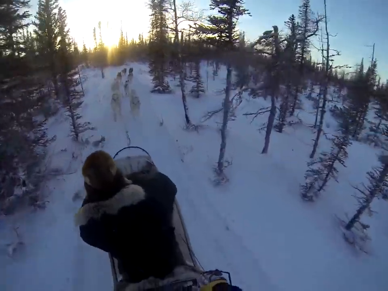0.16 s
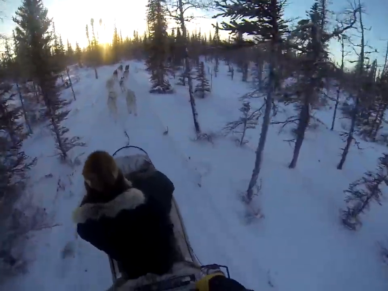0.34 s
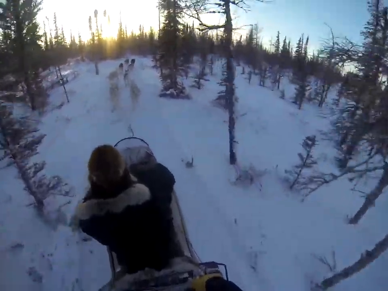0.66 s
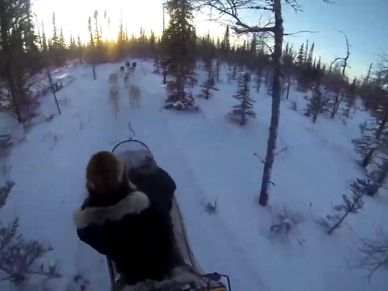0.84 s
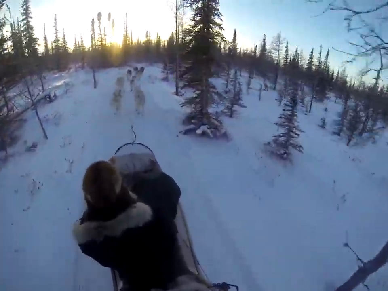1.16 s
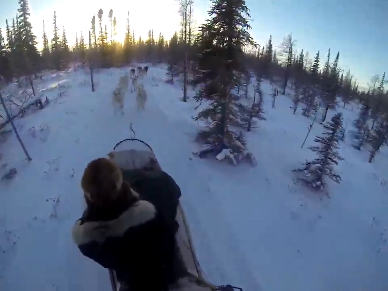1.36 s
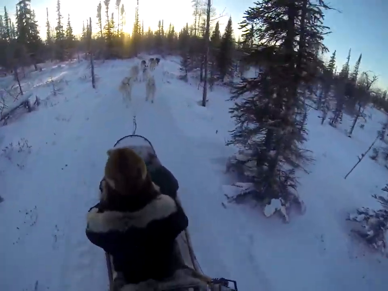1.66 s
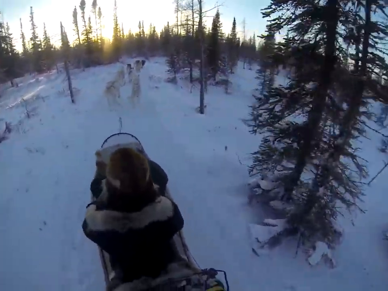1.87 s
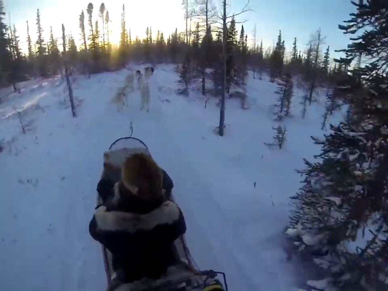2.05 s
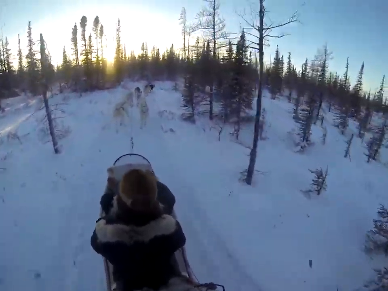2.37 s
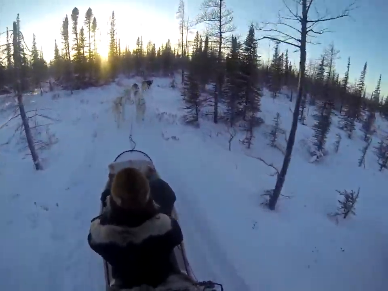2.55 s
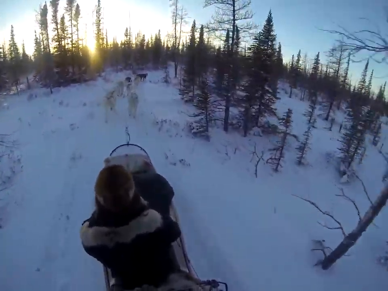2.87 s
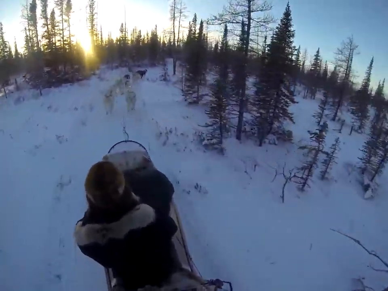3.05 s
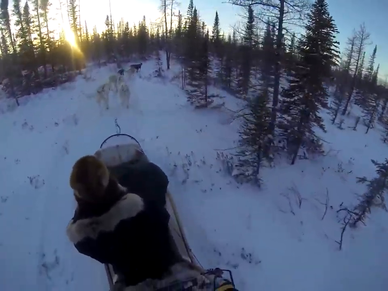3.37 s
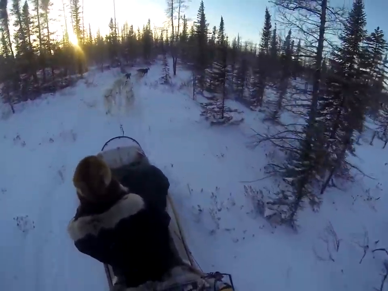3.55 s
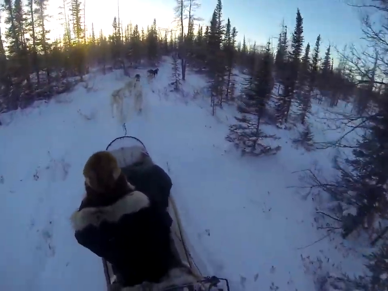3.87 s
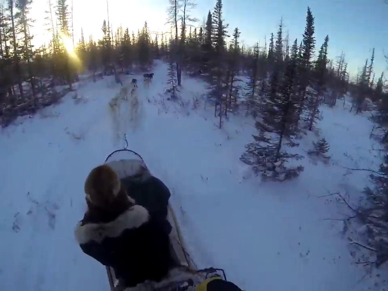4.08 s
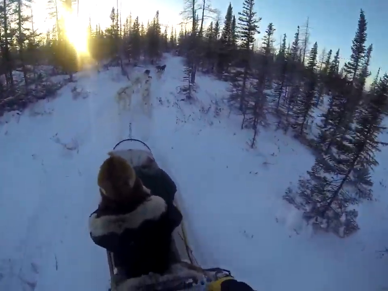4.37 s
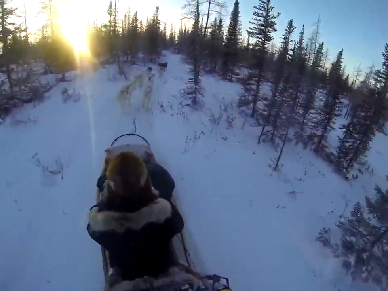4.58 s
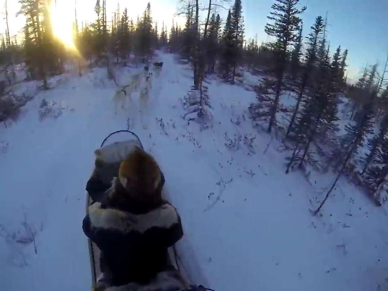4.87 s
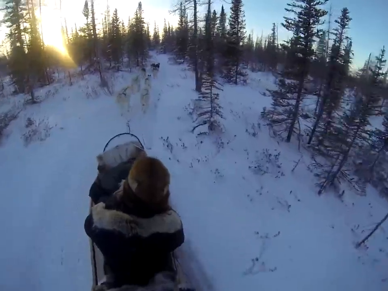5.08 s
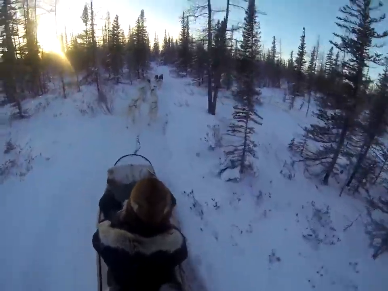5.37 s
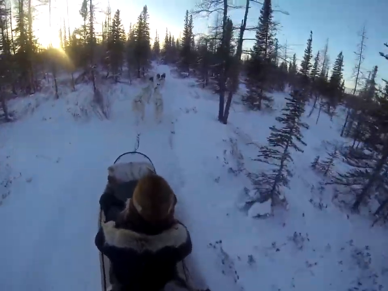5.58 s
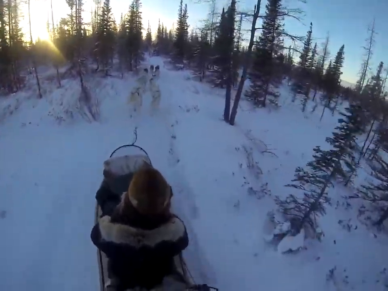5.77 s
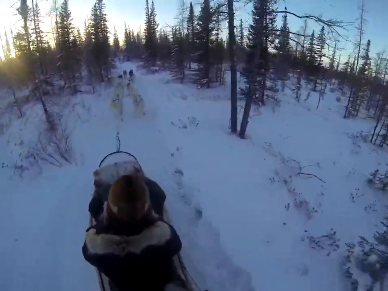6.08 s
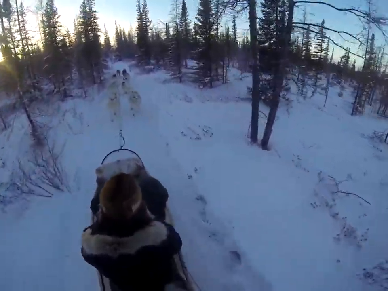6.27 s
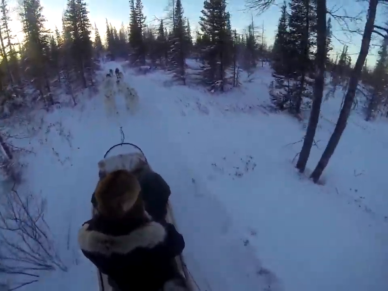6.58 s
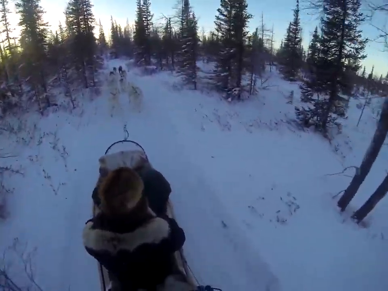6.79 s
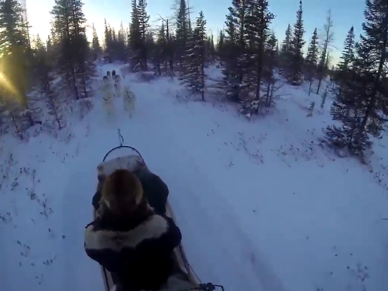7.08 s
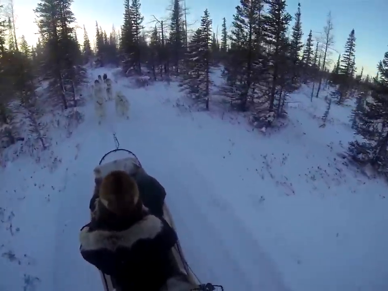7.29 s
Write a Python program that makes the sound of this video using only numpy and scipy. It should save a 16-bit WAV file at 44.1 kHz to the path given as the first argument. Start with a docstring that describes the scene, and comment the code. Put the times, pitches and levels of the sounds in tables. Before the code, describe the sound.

Deep bass wind and soft bumps on a moving sled, with quiet snow hiss, small crackles and one hard rattling jolt near 1.6 seconds.

```python
"""A low rumble of wind and jolts comes first: a dog sled runs along a snowy trail, heard from the driver's camera.
Filtered noise gives the wind, the droning frame, the runners' hiss over grainy snow and the sprayed powder.
Short enveloped oscillations give the jolts, taps and squeaks; tone with noise gives the thuds of the frame.
Bursts of noise and grains give rubbing cloth, scrapes, snapping ice and crumbling crust.
Short dull pulses of pressure sound at a knock and at the peak of the biggest jolt."""
import sys
import numpy as np
from scipy import signal
from scipy.fft import rfft, irfft, next_fast_len
from scipy.io import wavfile
from scipy.ndimage import uniform_filter1d, minimum_filter1d, map_coordinates

SR = 44100
rng = np.random.default_rng(int(sys.argv[2]) if len(sys.argv) > 2 else 0)


def put_to_file(sound):
    """Save the sound as 16-bit audio at rate SR, in the file named by the first command-line argument."""
    columns = np.atleast_2d(sound).T  # one column per channel
    safe = np.clip(columns, -1, 1)
    whole_steps = np.round(safe * 32767)
    wavfile.write(sys.argv[1], SR, whole_steps.astype(np.int16))


N = 327663

# Table levels are relative: each function adds its own offset or scaling.


def amp(db):
    """Level definition: decibels to amplitude gain."""
    return 10 ** (np.asarray(db) / 20)


def unit(x):
    """Normalisation: scale to rms 1."""
    return x / np.sqrt(np.mean(x ** 2) + 1e-20)


def clock():
    """Uniform sampling: the time of every sample in seconds."""
    return np.arange(N) / SR


def curves(rows):
    """Linear interpolation: one value per sample for each column after the time."""
    times, *columns = np.transpose(rows)
    return [np.interp(clock(), times, column) for column in columns]


def wobble(rate):
    """Band-limited fluctuation: a smooth random curve through `rate` knots a second."""
    knots = rng.standard_normal(int(N * rate / SR) + 4)
    return map_coordinates(knots, [clock() * rate])


def noise(count):
    """White noise: independent Gaussian samples."""
    return rng.standard_normal(count)


def coloured(x, points, tilt_db=0):
    """Minimum-phase filtering: shape x by (f/Hz, level/dB) points plus a tilt in dB per octave; rms 1."""
    size = 2 * next_fast_len(len(x) // 2 + 4096)
    octave = np.log2(np.fft.rfftfreq(size, 1 / SR) + 1)
    hz, db = np.transpose(points)
    response_db = np.interp(octave, np.log2(hz), db) + tilt_db * octave
    cepstrum = irfft(np.log(amp(response_db)))
    # Folding the cepstrum onto positive times makes the filter causal.
    cepstrum[1:size // 2] *= 2
    cepstrum[size // 2 + 1:] = 0
    response = np.exp(rfft(cepstrum))
    return unit(irfft(rfft(x, size) * response)[:len(x)])


def grains(count, rate, spread_db):
    """Random impulse process: about `rate` slips a second, of uneven size and random sign; rms 1."""
    chance, size, push = rng.random(count), noise(count), noise(count)
    slips = chance < rate / SR
    return unit(slips * amp(spread_db * np.clip(size, -2, 2)) * np.sign(push))


def swell(t, length):
    """Transient envelope: a quick rise to 1 at half the length and a slower fall."""
    u = 2 * t / length
    return u * np.exp(1 - u)


def add(track, s, sound):
    """Superposition: mix a sound into the track from time s in seconds."""
    part = track[round(s * SR):][:len(sound)]
    part += sound[:len(part)]


def load(press_s=0.013, half_db=-16):
    """Saturating response: how hard the jolts press the sled into the snow, 0-1; half_db alone gives 0.5."""
    t = clock()
    push = sum(amp(db - half_db) * np.exp(-.5 * ((t - s) / press_s) ** 2) for s, db, hz in JOLTS)
    return push / (1 + push)


# spectrum of wind on the microphone: f/Hz, level/dB
WIND_SPECTRUM = [(8, -11), (18, -6.5), (32, 2.5), (42, -4), (52, -7), (65, -16.5), (85, -36), (120, -41.5),
                 (250, -58.5), (600, -120)]
# gust strength: t/s, level/dB
GUSTS = [(0, -40), (.4, -35), (.7, -37), (1.08, -36), (1.3, -32), (1.6, -28), (1.8, -32.5), (2.03, -33.5),
         (2.55, -32.5), (2.9, -32.5), (3.25, -38), (3.65, -37), (4.05, -37.5), (4.3, -30.5), (4.8, -33),
         (5.4, -33.5), (5.85, -31), (6.4, -31.5), (6.7, -37.5), (7.15, -35.5), (7.4, -39.5)]


def wind(level_db=-0.5, evenness=0.84, flutter_db=4.0, flutter_rate=17, press_db=5.5):
    """Turbulent pressure: slow eddies, partly evened, flutter about the gusts and strengthen at jolts."""
    eddies = coloured(noise(N), WIND_SPECTRUM)
    power = np.abs(signal.hilbert(eddies)) ** 2
    strength = np.sqrt(np.abs(uniform_filter1d(power, size=2200)))
    strength = uniform_filter1d(strength, size=1100)
    evened = unit(eddies / (strength + 0.059) ** evenness)
    gust_db = curves(GUSTS)[0] + flutter_db * wobble(flutter_rate) + press_db * load()
    return amp(gust_db + level_db) * evened


# spectrum of the droning frame: f/Hz, level/dB
FRAME_SPECTRUM = [(50, -20), (90, -2.5), (125, -3.5), (160, -3), (240, -2), (310, -6.5), (400, -12),
                  (750, -20.5), (1100, -34), (3000, -58)]
# shaking of the frame on uneven ground: t/s, level/dB
SHAKE = [(0, -62.5), (0.28, -55.5), (0.45, -61.5), (0.95, -61), (1.15, -56.5), (1.42, -61), (1.8, -65),
         (2.7, -61), (3.3, -65), (3.8, -60.5), (4.15, -56), (4.52, -57), (4.73, -67.5), (5.2, -61.5),
         (5.45, -64), (6.3, -59), (6.75, -64), (7.15, -60.5), (7.43, -62)]


def frame_drone(ridges, level_db=-2.0, press_db=2.5, ridge_db=1.9):
    """Forced vibration: uneven ground shakes the frame, more strongly under load."""
    drone_db = curves(SHAKE)[0] + level_db + press_db * load() + ridge_db * ridges
    return amp(drone_db) * coloured(noise(N), FRAME_SPECTRUM)


# spectrum of the runners' hiss, coloured by the housing: f/Hz, level/dB
RUNNER_SPECTRUM = [(300, -15.5), (750, -14), (1050, -19.5), (1200, -9), (1370, 1), (1580, 2.5),
                   (1680, -3.5), (1800, -20.5), (2300, -29.5), (4000, -40.5)]
# runners gliding over the snow: t/s, level/dB
GLIDE = [(0, -53), (.17, -58.5), (.25, -54.5), (.4, -57.5), (.55, -58), (.66, -57.5), (.76, -61.5),
         (.88, -56.5), (.97, -61.5), (1.07, -56), (1.2, -65), (1.42, -55), (1.62, -56), (1.71, -60.5),
         (1.8, -58.5), (2.0, -59), (2.24, -60), (2.34, -54.5), (2.52, -58.5), (2.7, -54), (2.88, -60.5),
         (3.06, -56), (3.2, -58.5), (3.45, -59.5), (3.62, -57), (3.7, -53.5), (3.8, -56), (3.94, -49),
         (4.04, -55.5), (4.12, -56), (4.22, -53), (4.29, -60.5), (4.48, -54), (4.6, -60.5), (4.77, -56.5),
         (4.85, -59.5), (5.1, -55), (5.3, -59), (5.54, -63), (5.68, -60.5), (6.05, -57.5), (6.3, -57),
         (6.52, -63.5), (6.75, -63.5), (6.92, -60.5), (7.04, -57), (7.16, -54), (7.28, -68), (7.43, -60)]


def runner_hiss(crunch, ridges, level_db=0.0, press_db=-1, ridge_db=1.5):
    """Granular friction: crushed snow grains hiss, coloured by the housing and slightly weaker under load."""
    hiss_db = curves(GLIDE)[0] + level_db + press_db * load() + ridge_db * ridges
    return amp(hiss_db) * coloured(crunch, RUNNER_SPECTRUM)


# spectrum of sprayed powder: f/Hz, level/dB
SNOW_SPECTRUM = [(900, -8), (1500, -8.5), (2000, 1.5), (2450, -2.5), (3000, -0.5), (3500, -6.5), (4200, -6),
                 (5000, -8), (5700, -11.5), (6900, -14.5), (7700, -10), (8900, -17), (12400, -16.5),
                 (14000, -47)]
# loose snow sprayed by the runners: t/s, level/dB
SPRAY = [(0, -65), (0.6, -68.5), (1.25, -68.5), (1.8, -68.5), (2.35, -66.5), (2.9, -66), (3.55, -67),
         (3.92, -64), (4.3, -67.5), (4.6, -67.5), (5.05, -66), (5.45, -68.5), (6.35, -66.5), (6.7, -68),
         (7.43, -69)]


def snow_spray(crunch, ridges, level_db=3.5, ridge_db=0.95):
    """Granular scatter: powder sprays as broadband noise that shares the crunch of the runners."""
    powder = 0.51 * crunch + noise(N)
    spray_db = curves(SPRAY)[0] + level_db + ridge_db * ridges
    return amp(spray_db) * coloured(powder, SNOW_SPECTRUM)


def sled(ridge_rate=22):
    """Common excitation: small ridges in the trail modulate drone, hiss and spray together."""
    ridges = wobble(ridge_rate)
    crunch = grains(N, rate=1500, spread_db=6) + 0.89 * noise(N)
    return frame_drone(ridges) + runner_hiss(crunch, ridges) + snow_spray(crunch, ridges)


# a runner squeaking on cold snow: t/s, peak level/dB, length/s, starting f/Hz
SQUEAKS = [(4.195, -47.5, 0.012, 2030), (4.198, -46, 0.065, 1387), (4.232, -52, .032, 2214)]


def squeaks(level_db=-3.0, rise_hz_per_s=1500, waver=0.017):
    """Stick-slip oscillation: friction locks briefly into a thin, unsteady note that rises."""
    out, t = np.zeros(N), np.arange(SR // 10) / SR
    for s, db, length, hz in SQUEAKS:
        pitch = (hz + rise_hz_per_s * t) * (1 + waver * wobble(300)[:len(t)])
        arch = np.sin(np.pi * np.minimum(t / length, 1))
        note = np.sin(2 * np.pi * np.cumsum(pitch) / SR)
        add(out, s, amp(db + level_db) * arch * note)
    return out


# mean spectrum of contacts on the housing: f/Hz, level/dB
CONTACT_SPECTRUM = [(200, -16.5), (700, -31), (1050, -15), (1400, 9.5), (1850, -6), (2800, -6.5),
                    (3500, -9), (4200, -8.5), (6500, -19.5), (7800, -17.5), (9000, -25.5), (12500, -31),
                    (15000, -50)]


def contact_colour(uneven_db=3.0, count=70):
    """Modal excitation: each contact point stresses other narrow housing resonances; (f/Hz, level/dB)."""
    hz, db = np.transpose(CONTACT_SPECTRUM)
    grid = np.geomspace(hz[0], hz[-1], count)
    uneven = np.interp(np.log(grid), np.log(hz), db) + uneven_db * noise(count)
    return np.transpose([grid, uneven])


# patches of crust crumbling under the sled: t/s, level/dB, length/s, tilt/(dB per octave)
CRUMBLES = [(1.444, -47, 0.22, -2.5), (4.738, -54.5, 0.07, 2), (4.87, -56, 0.091, 2),
            (5.034, -53, 0.11, -2), (6.289, -61, .2, -1.5)]


def crumbles(level_db=-2.5, rate=420, spread_db=4):
    """Successive brittle fracture: crust gives way in a run of sharp grains that swells and fades."""
    out, t = np.zeros(N), np.arange(SR // 3) / SR
    for s, db, length, tilt_db in CRUMBLES:
        arch = np.sqrt(np.abs(np.sin(np.pi * np.minimum(t / length, 1))))
        crust = coloured(grains(len(t), rate, spread_db), contact_colour(), tilt_db)
        add(out, s, amp(db + level_db) * arch * crust)
    return out


# snaps of ice and snow crust: t/s, peak level/dB, 1/e decay/s, tilt/(dB per octave)
TICKS = [(1.4155, -31, .0025, -2.5), (1.5056, -22, 0.0026, -3.5), (1.5196, -21, 0.0048, 0),
         (1.552, -30, 0.0029, -2), (1.6038, -20.5, 0.0022, -3), (1.626, -39, 0.004, 2),
         (1.633, -26, 0.0032, -4.5), (3.995, -35, 0.0027, 1), (4.68, -38.5, 0.0037, 2),
         (4.7, -37, .004, -1), (4.712, -34.5, .003, 2), (4.727, -41, 0.0034, 6), (4.742, -44, .006, 6),
         (4.761, -44, .003, -6), (4.7775, -41, 0.0053, 7), (4.787, -35, .003, 1), (4.798, -36, .004, 3),
         (4.895, -43, .003, 9), (4.927, -26, 0.004, 0.5), (4.934, -39, 0.0062, -1), (5.034, -37, .004, -1),
         (5.064, -39, .003, 1), (5.384, -38, .004, -1), (6.212, -42, 0.0044, -7),
         (6.2302, -36.5, 0.011, -2.5), (6.281, -34, .005, -10), (6.3722, -25.5, 0.0045, -5.5),
         (6.381, -39, 0.0048, -1), (6.428, -36.5, 0.0074, -3.5), (6.444, -42, .004, 1),
         (6.5655, -36.5, .004, -3), (6.826, -34, 0.0035, -1.5), (6.841, -42, 0.004, -2),
         (7.018, -37, 0.0032, -3), (7.15, -47, 0.0071, 1.5)]


def ticks(level_db=-8, attack=0.00027):
    """Brittle fracture: crust and ice snap with a sudden crack that dies in a few milliseconds."""
    out, t = np.zeros(N), np.arange(SR // 10) / SR
    for s, db, decay, tilt_db in TICKS:
        crack = coloured(noise(len(t)), contact_colour(), tilt_db)
        envelope = (1 - np.exp(-t / attack)) * np.exp(-t / decay)
        add(out, s, amp(db + level_db) * envelope * crack)
    return out


def rub(db, length, tilt_db, colour):
    """Stick-slip friction: one short gritty burst, its brightness set by tilt_db."""
    t = np.arange(SR // 5) / SR
    slips = grains(len(t), rate=1500, spread_db=1.5) + 0.26 * noise(len(t))
    return amp(db) * swell(t, length) * coloured(slips, colour, tilt_db)


# cloth rubbing on the housing: t/s, peak level/dB, length/s, tilt/(dB per octave)
SCUFFS = [(0.457, -42, 0.0066, -4), (0.7, -46.5, 0.0068, 1), (1.054, -46, 0.011, -0.5),
          (1.448, -39.5, 0.029, -0.5), (1.494, -32, 0.0097, -5.5), (1.512, -37, .01, -5.5),
          (1.534, -29.5, 0.015, -4), (1.582, -41, 0.016, -3.5), (1.602, -36, 0.014, -2.5),
          (1.622, -39, 0.017, -5), (3.874, -51, 0.032, -3), (4.459, -36.5, 0.0045, -4),
          (4.741, -43, 0.021, -0.5), (4.878, -44.5, 0.027, -1.5), (5.033, -41.5, 0.027, -2),
          (5.072, -35, 0.013, -5.5), (5.142, -45, 0.018, 3.5), (5.669, -45, 0.012, 2), (6.33, -51, .03, -3),
          (6.452, -45.5, 0.016, -3.5), (6.552, -46.5, 0.022, -1.5), (7.11, -42, 0.04, -4.5)]
# faint rustles at random moments
RUSTLES_PER_S, RUSTLE_DB, RUSTLE_SPREAD_DB = 7, -51.5, -1.5
RUSTLE_S, RUSTLE_TILT_DB = 0.0057, -3


def scuffs(level_db=-8):
    """Sliding friction: clothing rubs strongly at set times and rustles faintly at random moments."""
    out = np.zeros(N)
    for s, db, length, tilt_db in SCUFFS:
        add(out, s, rub(db + level_db, length, tilt_db, contact_colour()))
    for when, size in rng.random((int(RUSTLES_PER_S * N / SR), 2)):
        rustle_db = RUSTLE_DB + level_db + RUSTLE_SPREAD_DB * (2 * size - 1)
        add(out, when * N / SR, rub(rustle_db, RUSTLE_S, RUSTLE_TILT_DB, contact_colour()))
    return out


# hard scrapes: t/s, peak level/dB, length/s, tilt/(dB per octave), resonance f/Hz
SCRAPES = [(1.4593, -31.5, 0.0058, 1, 5500), (1.5026, -32, 0.006, 0.5, 4170),
           (1.527, -31.5, 0.0065, 2.5, 5700), (1.533, -44, 0.016, 1, 4450),
           (1.5975, -28, 0.0049, -4.5, 2300), (1.61, -35, 0.0036, 2, 4500), (5.085, -32, .006, -3.5, 1950),
           (5.14, -35, 0.005, 2.5, 4970)]


def scrapes(level_db=-8, ring_db=8, width_octaves=0.062):
    """Friction-driven resonance: hard surfaces skid briefly and one resonance stands out of each skid."""
    out = np.zeros(N)
    for s, db, length, tilt_db, ring_hz in SCRAPES:
        hz, colour_db = contact_colour().T
        lift_db = ring_db * np.exp(-.5 * (np.log2(hz / ring_hz) / width_octaves) ** 2)
        colour = np.transpose([hz, colour_db + lift_db])
        add(out, s, rub(db + level_db, length, tilt_db, colour))
    return out


# sharp taps on the housing: t/s, peak level/dB, ring f/Hz, 60 dB decay/s
TAPS = [(0.3464, -27, 1580, 0.0086), (0.701, -45.5, 1420, 0.031), (0.882, -44.5, 1430, 0.0093),
        (1.415, -44, 1490, .02), (1.5412, -33, 1370, 0.042), (1.582, -39.5, 1430, 0.035),
        (1.604, -33.5, 1540, 0.013), (2.577, -47, 1440, 0.0099), (3.717, -42.5, 1524, 0.029),
        (3.862, -46, 1410, 0.021), (3.932, -44, 1326, 0.035), (4.0284, -40, 1430, 0.017),
        (5.0895, -36, 1390, 0.045), (6.829, -50, 1450, 0.024), (6.842, -47.5, 1490, 0.038)]
# the housing's modes: ratio to ring f, level/dB
HOUSING_MODES = [(1.001, 4.5), (1.27, -21.5)]


def taps(attack=0.00048, crack=0.13, crack_tilt_db=-3, level_db=3):
    """Impulsive modal response: hard contacts crack and set the housing ringing, with exponential decay."""
    out, t = np.zeros(N), np.arange(SR // 10) / SR
    for s, db, hz, t60 in TAPS:
        ring = sum(amp(mode_db) * np.sin(2 * np.pi * hz * ratio * t) for ratio, mode_db in HOUSING_MODES)
        ring = ring + crack * coloured(noise(len(t)), CONTACT_SPECTRUM, crack_tilt_db)
        decay = amp(db + level_db - 60 * t / t60)
        add(out, s, decay * (1 - np.exp(-(t / attack) ** 2)) * ring)
    return out


# dull pushes of pressure: t/s, peak level/dB, 1/e decay/s
PUSHES = [(0.3459, -34, 0.0008), (1.6339, -17.5, 0.0081)]


def pressure_pushes(rise=0.0004):
    """One-sided pulse: short dull pushes at a knock and at the biggest jolt, as of an overloaded microphone."""
    out, t = np.zeros(N), np.arange(SR // 10) / SR
    for s, db, decay in PUSHES:
        onset = (1 - np.exp(-(t / rise) ** 2)) ** 2
        add(out, s, amp(db) * onset * np.exp(-t / decay))
    return out


# dull blows through the frame: t/s, peak level/dB, length/s, tilt/(dB per octave), starting ring f/Hz
THUDS = [(1.044, -30, 0.0084, -5, 171), (1.072, -34.5, 0.0083, -7, 243), (1.101, -41.5, 0.026, -2, 245),
         (1.141, -36, 0.018, -8.5, 179), (1.451, -26, 0.017, -2, 191), (1.492, -24.5, 0.02, -2.5, 192),
         (1.507, -24, 0.0092, 3, 240), (1.540, -24.5, 0.015, 0, 238), (1.582, -28.5, 0.021, 3, 225),
         (1.612, -30, 0.031, -4.5, 154), (1.703, -40, 0.0085, -2, 180), (4.5, -40, 0.085, -9.5, 130.4),
         (5.071, -43, 0.016, 1, 232), (5.085, -33, 0.018, 1, 238), (6.232, -43, .014, 1.5, 235),
         (6.37, -46, 0.016, 2.5, 265), (6.56, -46.5, 0.014, 1.5, 230), (7.12, -46.5, 0.031, 3.5, 219)]
# noise spectrum of a blow before its tilt: f/Hz, level/dB
BLOW_SPECTRUM = [(50, -23.5), (110, 9), (160, 9.5), (235, 8), (320, -1), (420, -9), (750, -11.5),
                 (1100, -40), (3000, -56.5)]


def thuds(level_db=-10.0, ring=1.26, fall_hz_per_s=400):
    """Damped resonance: the wooden frame drops into ruts and rings, its pitch falling steadily."""
    out, t = np.zeros(N), np.arange(SR // 5) / SR
    for s, db, length, tilt_db, hz in THUDS:
        cycles = np.cumsum(hz - fall_hz_per_s * t) / SR + rng.random()
        note = ring * np.sin(2 * np.pi * cycles)
        shudder = coloured(noise(len(t)), BLOW_SPECTRUM, tilt_db)
        add(out, s, amp(db + level_db) * swell(t, length) * (note + shudder))
    return out


# jolts that swing the camera: t/s at the centre, peak level/dB, swing f/Hz
JOLTS = [(0, -20, 26), (0.039, -22.5, 22.5), (0.198, -17.5, 17.9), (0.313, -13.5, 19.3), (0.452, -23.5, 24),
         (0.516, -23, 38), (0.634, -21, 40), (0.82, -16.5, 38), (0.876, -22.5, 32), (0.99, -22.5, 34),
         (1.21, -21, 34.7), (1.29, -25.5, 47), (1.357, -20.5, 36.3), (1.485, -10, 35.7),
         (1.559, -12.5, 27.2), (1.634, -1.5, 32.2), (1.918, -17, 31.6), (2.214, -27.5, 41),
         (2.285, -21, 30.2), (2.334, -17.5, 31.3), (2.461, -25.5, 23.4), (2.662, -22.5, 27),
         (3.146, -26, 29), (3.438, -20.5, 33), (3.847, -23.5, 30.6), (4.174, -14, 30.6), (4.235, -16.5, 28),
         (4.451, -32, 52), (4.525, -27, 29.6), (4.646, -29, 50), (4.806, -30, 26.4), (4.931, -21, 33.5),
         (5.147, -19, 25.5), (5.235, -17.5, 20.4), (5.511, -31.5, 44), (5.632, -28.5, 27),
         (5.71, -26, 21.7), (5.764, -25, 24.6), (5.895, -29, 34), (6.103, -24, 35), (6.247, -22, 36),
         (6.303, -15, 32.3), (6.555, -23.5, 28), (6.961, -24.5, 33), (7.136, -17, 32.7), (7.2, -21.5, 20)]
# spectrum of the soft thump inside a jolt: f/Hz, level/dB
THUMP_SPECTRUM = [(30, -32), (55, -7.5), (75, 2.5), (110, -17.5), (160, -23.5), (400, -77.5)]


def jolts(level_db=0.36, swing_cycles=0.63, thump_db=-35, thump_growth=0.79, thump_s=0.016):
    """Inertial oscillation: each bump swings the camera for a cycle or two, with a thump at its height.

    swing_cycles and thump_s are Gaussian widths; thump_growth is dB of thump per dB of jolt.
    """
    out, thump, t = np.zeros(N), np.zeros(N), clock()
    for s, db, hz in JOLTS:
        near = np.abs(t - s) < .25
        since = t[near] - s
        envelope = np.exp(-.5 * (hz * since / swing_cycles) ** 2)
        out[near] -= amp(db + level_db) * np.cos(2 * np.pi * hz * since) * envelope
        thump[near] += amp(thump_growth * db + thump_db) * np.exp(-.5 * (since / thump_s) ** 2)
    return out + thump * coloured(noise(N), THUMP_SPECTRUM)


def scene():
    """Linear superposition: all sounds add at the one microphone."""
    background = wind() + sled()
    snow = squeaks() + crumbles() + ticks()
    contacts = scuffs() + scrapes() + taps()
    blows = pressure_pushes() + thuds() + jolts()
    return (background + snow + contacts + blows)[None]


def record(dry, ceiling=.98, top_hz=15300):
    """Peak limiting and band limiting: the camera holds peaks to the ceiling, then drops all above top_hz."""
    needed = ceiling / np.maximum(np.abs(dry), ceiling)
    gain = uniform_filter1d(minimum_filter1d(needed, size=441), size=441)
    held = dry * gain
    size = next_fast_len(N + SR // 2)
    kept = np.fft.rfftfreq(size, 1 / SR) < top_hz
    return irfft(rfft(held, size) * kept, size)[..., :N]


dry = scene()
out = record(dry)
put_to_file(out)
```